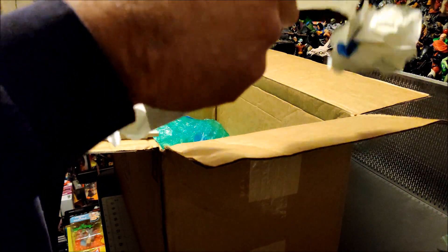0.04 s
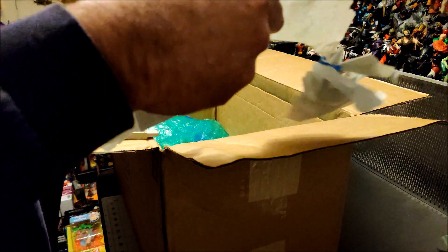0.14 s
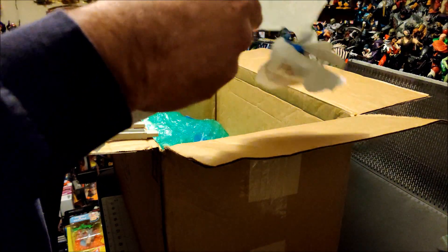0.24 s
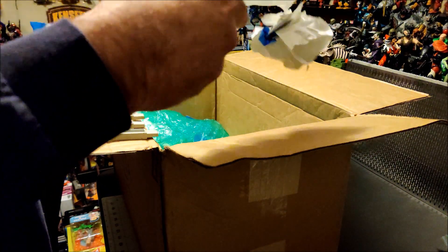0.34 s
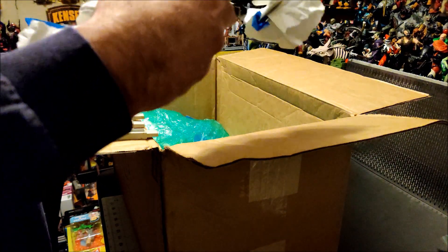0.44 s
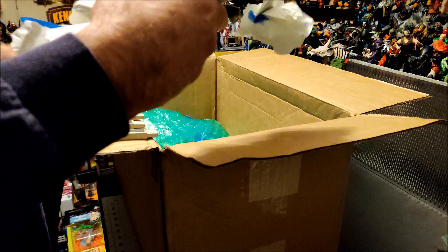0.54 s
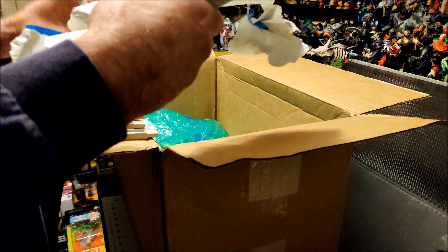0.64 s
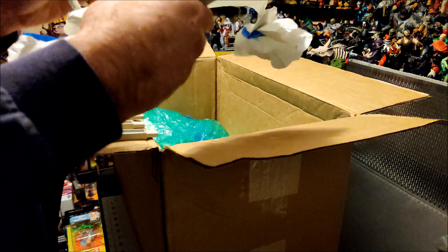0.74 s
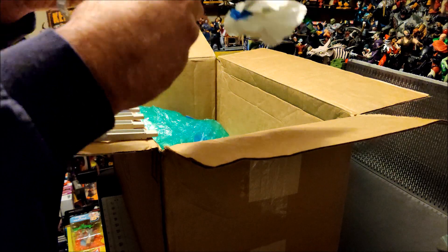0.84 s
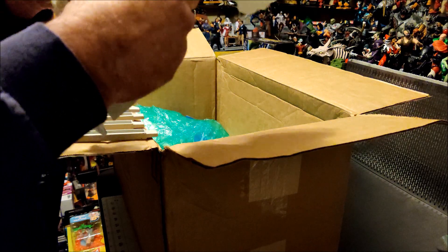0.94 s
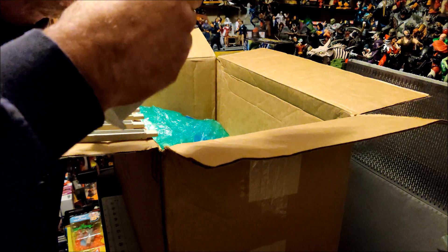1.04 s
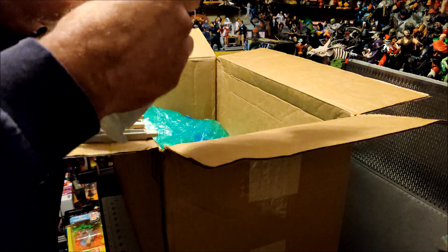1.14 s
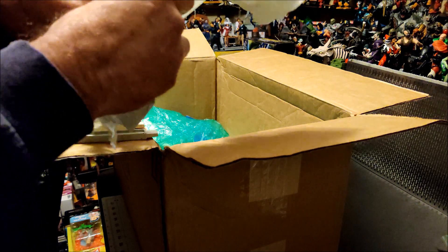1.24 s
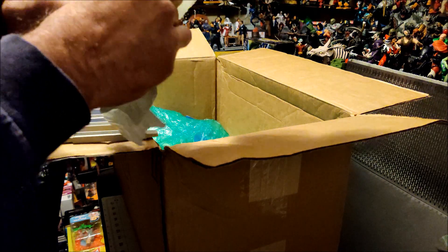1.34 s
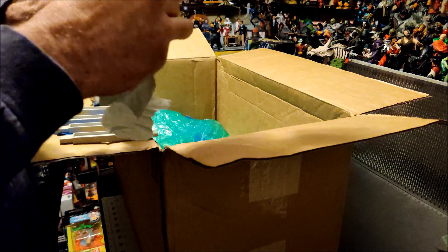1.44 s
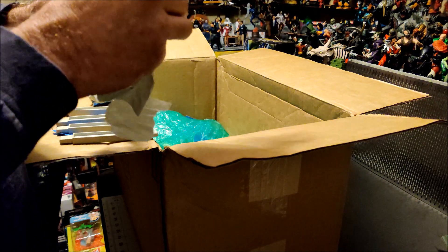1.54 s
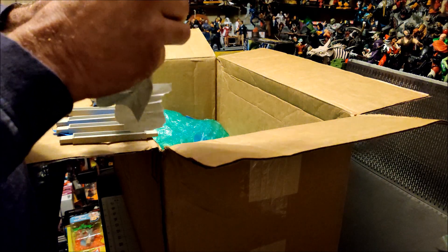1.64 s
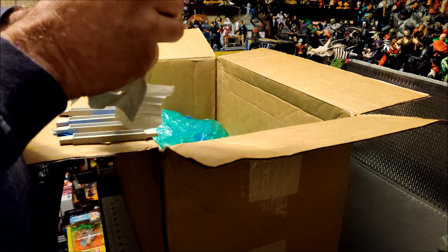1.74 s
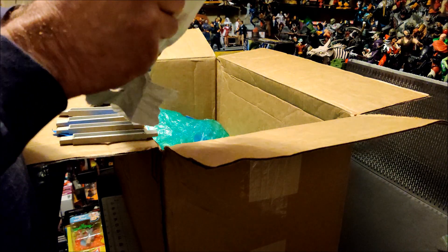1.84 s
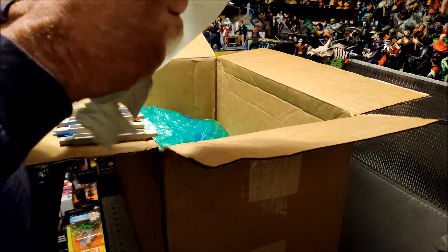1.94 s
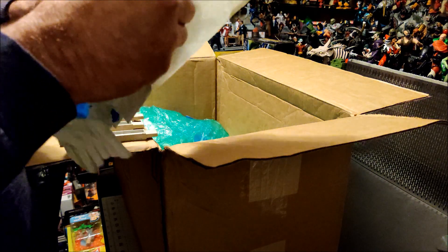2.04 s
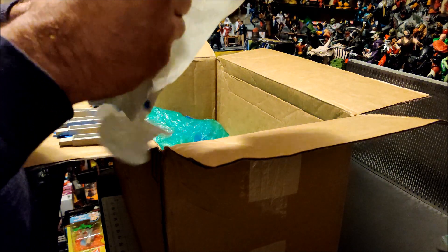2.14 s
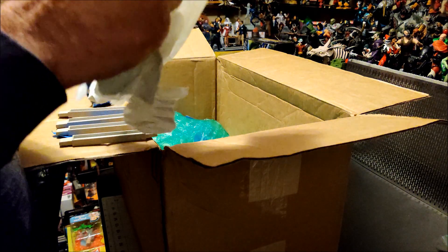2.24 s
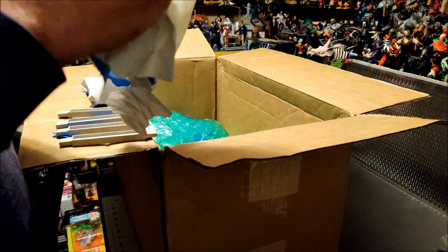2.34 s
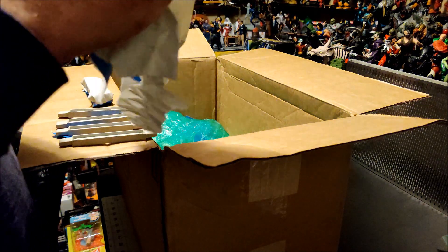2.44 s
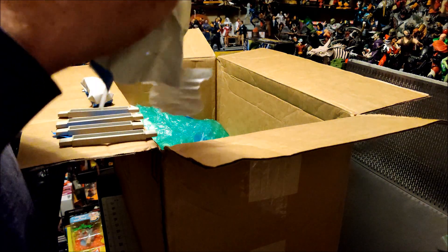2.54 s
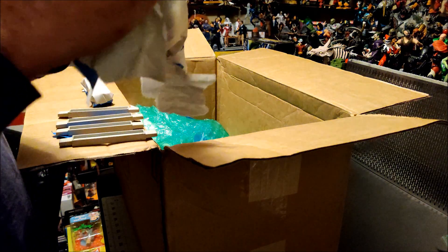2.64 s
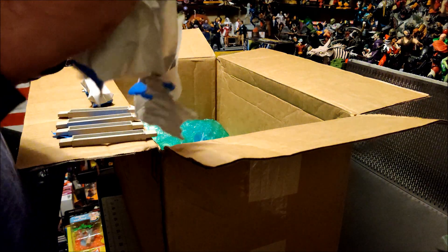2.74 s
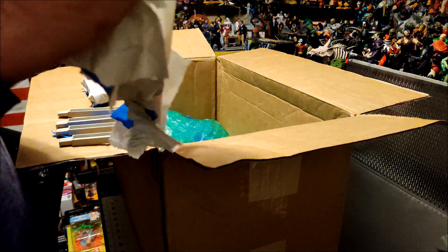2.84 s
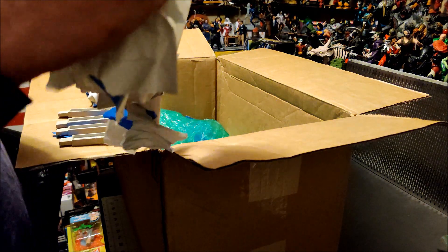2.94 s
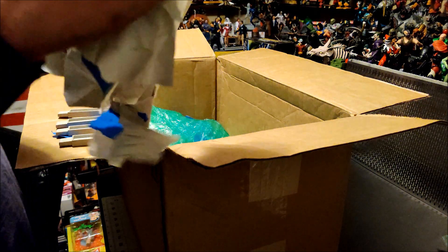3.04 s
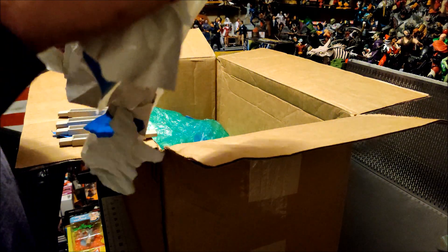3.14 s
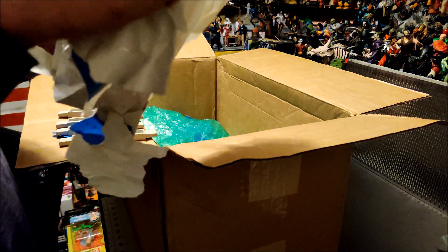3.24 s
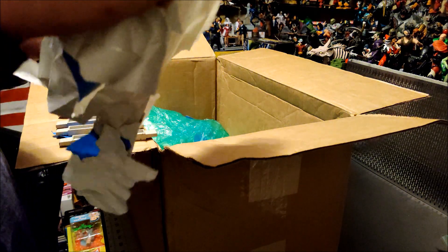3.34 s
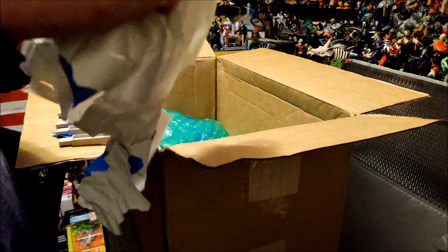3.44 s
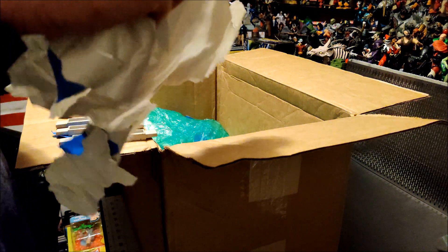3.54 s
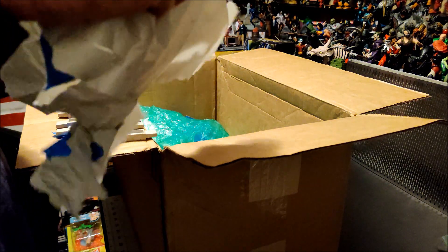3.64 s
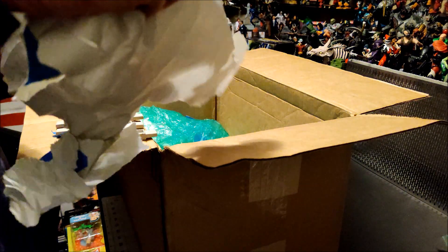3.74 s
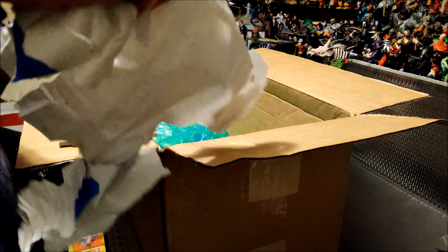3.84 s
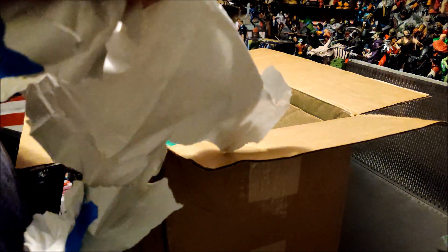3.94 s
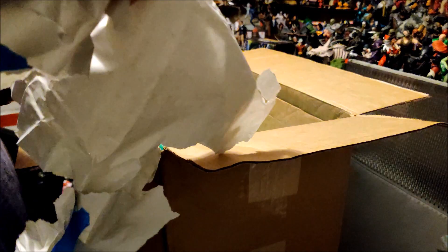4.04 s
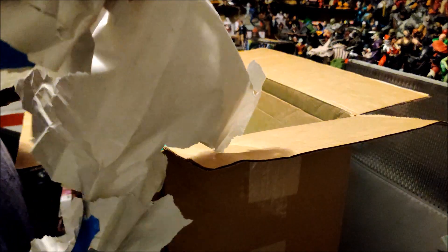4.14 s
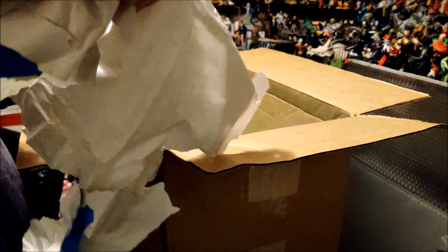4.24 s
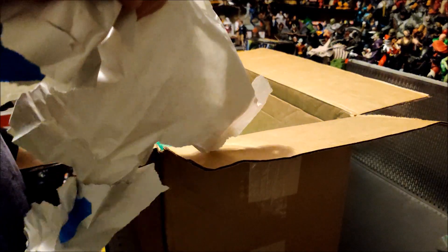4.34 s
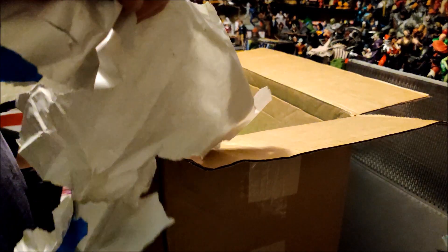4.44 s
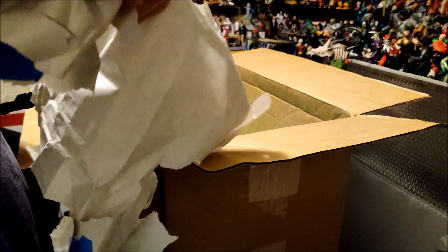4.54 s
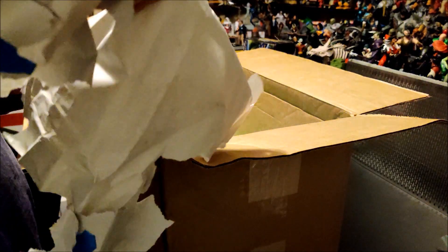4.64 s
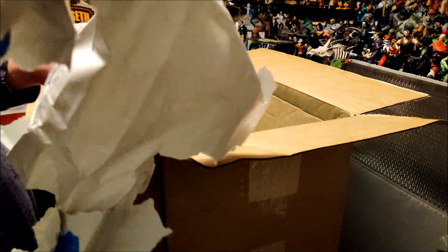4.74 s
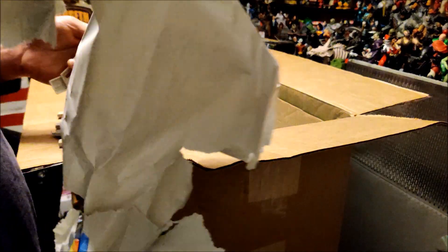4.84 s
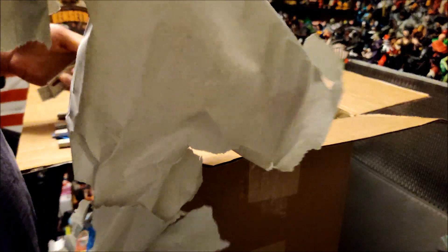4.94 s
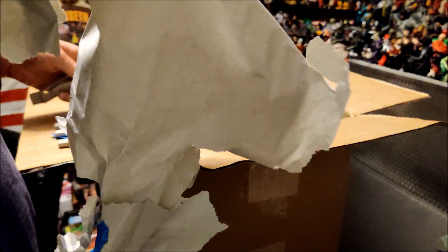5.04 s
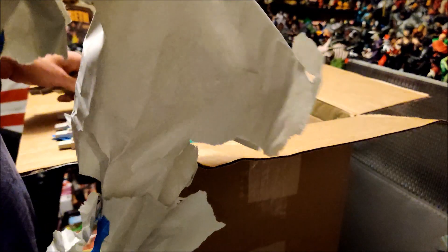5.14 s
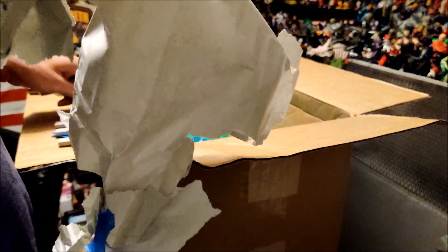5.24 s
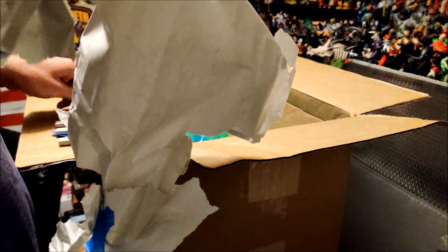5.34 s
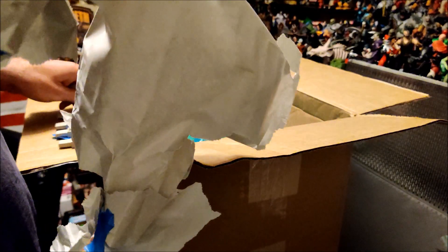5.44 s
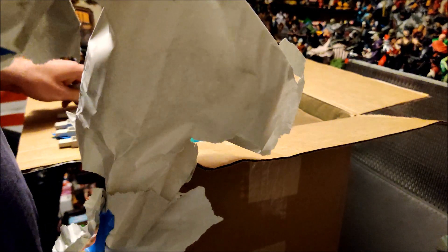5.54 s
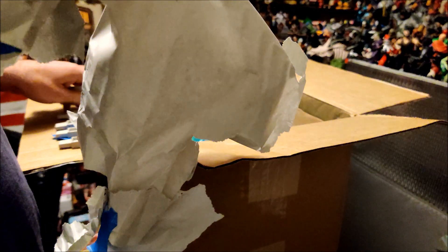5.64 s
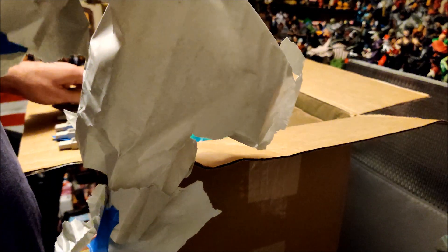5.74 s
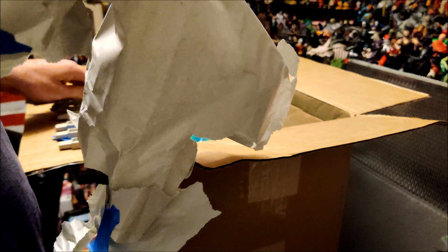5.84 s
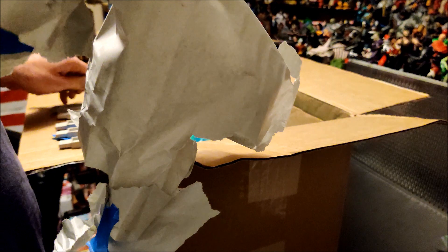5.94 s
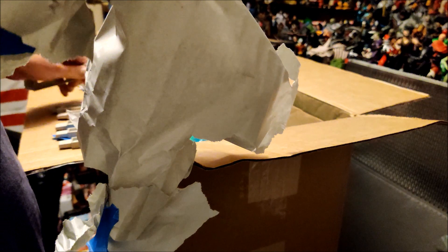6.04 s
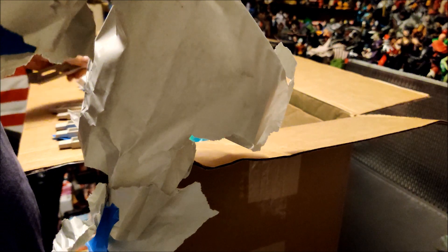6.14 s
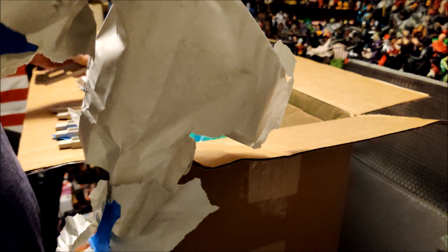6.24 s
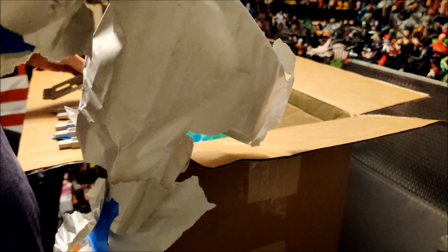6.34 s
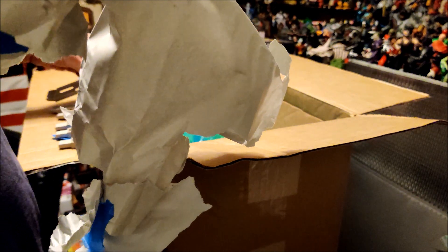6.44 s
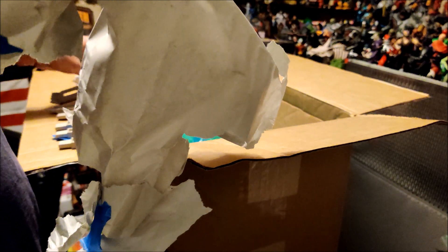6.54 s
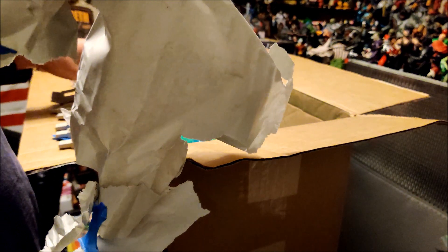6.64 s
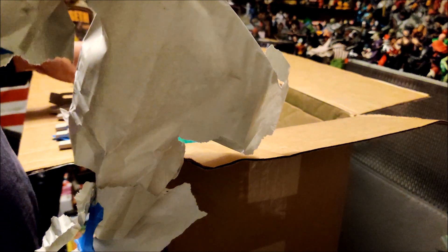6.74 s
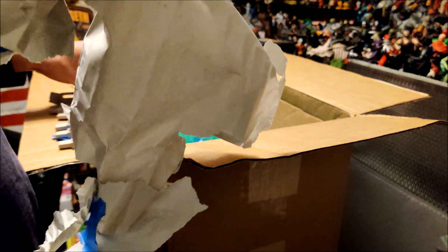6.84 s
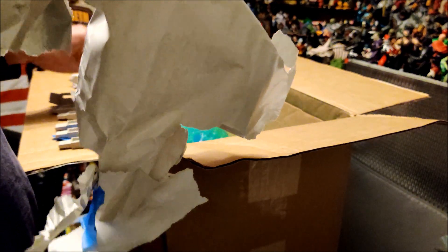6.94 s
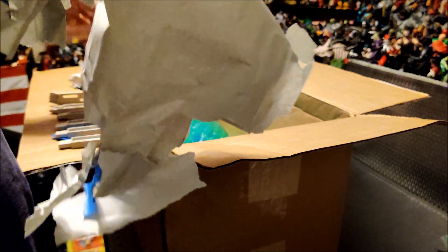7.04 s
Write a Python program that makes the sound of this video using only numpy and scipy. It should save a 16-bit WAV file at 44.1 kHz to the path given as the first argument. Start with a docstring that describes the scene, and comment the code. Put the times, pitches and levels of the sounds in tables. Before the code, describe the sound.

In a quiet small room, nearby hands unwrap something from packing paper. The sheet crinkles lightly at first around a soft knock, then crackles and snaps busily as it is tugged and flaps open. The rustling dies away and gives way to several light taps, brief slides and a single small clink on a tabletop. The microphone carries a faint steady high whine with hiss and low hum.

```python
"""A small room: packing paper is pulled off a wrapped item by hand, over a cardboard box.
Tiny folds flip and layers rub, so the sheet rustles; each tug brings a burst of crackle.
Creases flip with sharp snaps that set off smaller ones, and broad panels flap and push air.
Then small things are slid and set down on the table, with one light clink.
Beneath lie a faint mains hum and hiss, which ringing microphone ports turn into a thin whine."""
import sys
import numpy as np
from scipy import signal
from scipy.fft import rfft, irfft, next_fast_len
from scipy.io import wavfile
from scipy.ndimage import uniform_filter1d

SR = 44100
rng = np.random.default_rng(int(sys.argv[2]) if len(sys.argv) > 2 else 0)


def store_wav(level_fs):
    """Save 16-bit WAV to argv[1]."""
    pcm = np.round(np.clip(np.atleast_2d(level_fs), -1, 1) * 32767)
    wavfile.write(sys.argv[1], SR, pcm.T.astype(np.int16))


N = 312661
TIME_S = np.arange(N) / SR
TABLE_WET_DB = -4.5

# Table levels are relative; spectra are per Hz.
# still-room spectrum: f/Hz, level/dB
AIR_SPECTRUM = [(20, 4.5), (50, 1), (80, -9), (160, -14), (300, -13.5), (500, -19), (1000, -22.5),
                (2500, -25.5), (3600, -31.5), (5100, -41), (7000, -33.5), (16000, -30)]
# mains hum partials: f/Hz, level/dB
HUM_PARTIALS = [(120, -76), (241, -85)]
# paper spectrum: f/Hz, level/dB
PAPER_SPECTRUM = [(80, -15), (170, -6), (500, -2), (800, -4), (1700, -0.5), (3300, -2.5), (4200, -9.5),
                  (6000, -15), (8000, -14.5), (10000, -17.5), (12500, -23.5), (16000, -27.5)]
# how hard the sheet is kept moving: t/s, level/dB
RUSTLE_LEVELS = [(0, -78.5), (0.45, -57.5), (0.76, -66.5), (1.1, -56.5), (1.45, -43.5), (1.9, -40.5),
                 (2.64, -40.5), (2.73, -53.5), (2.88, -41), (3.27, -41.5), (3.34, -48.5), (3.47, -37.5),
                 (3.98, -39), (4.1, -45.5), (4.3, -36.5), (4.7, -38.5), (4.87, -61.5), (5.4, -80)]
# things set down: t/s, level/dB, contact cut-off/Hz, settling/s, hard share/0-1
SET_DOWNS = [(0.27, -47, 930, 0.043, 0.24), (0.596, -35.5, 900, 0.0073, 0.2),
             (0.607, -32, 1120, 0.032, 0.27), (5.355, -32.5, 2640, 0.00094, 0.9),
             (5.734, -36.5, 1800, 0.023, 0), (5.865, -42.5, 908, 0.045, 0.15),
             (5.961, -27.5, 2500, 0.029, 0), (6.459, -69.5, 9000, .001, 0.7),
             (6.655, -46, 895, 0.032, 0.16), (6.821, -28, 1310, 0.025, 0.1)]
# table-top modes: f/Hz, level/dB, T60/s
TABLE_MODES = [(163, -13.5, 0.15), (293, 1.5, 0.099), (355, -9, 0.02), (469, 3, 0.044), (593, 2.5, 0.032),
               (706, -0.5, 0.064), (800, 5, 0.025), (900, 2, 0.0097), (1230, -12, 0.037), (1900, -13, 0.02),
               (2400, -8, .013), (2970, -18, .012)]
# modes of a small hard item: f/Hz, level/dB, T60/s
ITEM_MODES = [(540, 2.5, 0.058), (760, -4, 0.016), (1040, 5, 0.017), (1300, 2, .018), (1960, -1, 0.02),
              (2490, 5, 0.013), (4750, 2.5, 0.0074)]
# main creases that flip: t/s, level/dB, body/dB, treble/dB, crackle run/dB
CREASES = [(0.413, -26.5, 0.5, -19, -2), (0.501, -15, -31, -4, -5), (0.829, -21.5, -0.5, -30, 4.5),
           (0.917, -17.5, -8, -5, 2), (1.137, -21, -7, 5.5, -4), (1.182, -22, -2, 9, 4.5),
           (1.218, -13, 0, 7, 1.5), (1.311, -12.5, -6, -11, 4.5), (1.356, -7, 2.5, 7, -6.5),
           (1.413, -4.5, -8, -4, -3), (1.454, -9, -21, -17, 0.5), (1.522, 0, -7, 7, -5),
           (1.575, -11.5, 9.5, 0, -2), (1.636, -7.5, -1.5, -21, -4), (1.746, -0.5, -4, -6, -1),
           (1.835, -7, -14, 9, -6), (1.882, 4.5, -3, -7, -16), (1.946, 2, 0.5, 5, -5.5),
           (2.11, -7, 0, 13, -7), (2.145, -5.5, 5, -2, -8), (2.219, -5, 5, -4, 2.5),
           (2.272, 3.5, 0.5, 1.5, -4), (2.327, 5.5, -1, 1.5, 1), (2.407, -8.5, 4.5, 1, 3),
           (2.418, -3, 0, 5, -22), (2.485, -6.5, 2, -12, -2), (2.568, -2.5, 1.5, -20, 0),
           (2.632, -1.5, 2, -29, -4), (2.682, -12.5, 10, -17, -5), (2.729, -10.5, -10, -25, -16),
           (2.741, -10, -12, -19, -5), (2.778, -5, -5, 7.5, -0.5), (2.802, -4.5, 1, 4.5, 1.5),
           (2.843, -10, 2, 10, -13), (2.911, 0, -7, -6, -12), (2.926, 4.5, -5.5, -5.5, 1.5),
           (2.973, -2, 4.5, -1, -3.5), (3.004, -5, 3, 7.5, -7), (3.049, -6, 1, -2, -7),
           (3.182, -4, -7, 5, -2), (3.266, -4.5, -1, 0, 1), (3.362, -9, -23, -3, -1),
           (3.42, -4, -8, 0.5, -4), (3.478, 3, -21, -10, -9), (3.598, 2, -7.5, -28, 2),
           (3.774, 5, -6.5, -4, -3.5), (3.883, -2, -3.5, -5, -7), (3.95, 0.5, 5, 0, -2.5),
           (4.007, -6.5, 5, 10.5, 3.5), (4.135, -6.5, -21, 3, -4), (4.178, -6, -38, 0, 3.5),
           (4.218, 2, -17, -7, -4.5), (4.494, -6.5, 2, 5, -5), (4.636, 2.5, -2, 1, -5.5),
           (4.896, -14, 5, -8, -10), (4.975, -26.5, 8.5, 5, -2.5), (5.034, -34, 2, 2, 8.5)]
# tugs on the sheet: t/s, length/s, level/dB, body/dB
TUGS = [(0.989, 0.021, -43, -1), (1.311, 0.028, -34, -4), (1.488, .06, -40.5, 1.5),
        (1.683, 0.048, -36.5, 3), (1.819, 0.096, -25.5, -2), (1.933, 0.062, -38.5, 7),
        (2.027, 0.016, -34.5, 6.5), (2.26, .018, -26, 0), (2.312, 0.015, -24, -1.5), (2.535, 0.058, -29, 1),
        (2.906, 0.027, -30, 1.5), (2.992, .045, -39.5, 8), (3.149, 0.064, -32.5, 1.5),
        (3.435, 0.039, -27.5, -4.5), (3.585, 0.099, -30, 0.5), (3.712, 0.05, -33, -1.5),
        (3.827, 0.019, -34, 4.5), (3.885, 0.05, -29.5, 4), (3.999, 0.019, -29.5, 2.5),
        (4.22, 0.039, -23.5, -1.5), (4.367, 0.034, -31.5, 6.5), (4.573, 0.081, -31.5, -6),
        (4.794, 0.018, -42, 13)]
# panel flaps: t/s, level/dB
PANEL_FLAPS = [(1.95, -55), (2.46, -52), (3.06, -45.5), (3.56, -54), (3.66, -49), (3.94, -52.5),
               (4.26, -46.5), (4.47, -46), (4.69, -50), (4.98, -56.5)]
# spectrum of pushed air: f/Hz, level/dB
PUSH_SPECTRUM = [(20, -0.5), (55, -4), (110, -6), (170, -7), (300, -20.5), (700, -40.5), (2000, -63)]
# pushes across the table: t/s, length/s, level/dB, run-up/s
SLIDE_STROKES = [(5.146, .1, -58.5, 0.016), (5.731, 0.042, -52.5, .005), (5.797, 0.052, -56.5, 0.043),
                 (5.955, 0.013, -51, 0.0055), (6.546, 0.11, -58, 0.11), (6.812, 0.017, -54, .006),
                 (7.027, .06, -65.5, 0.038)]
# sliding friction spectrum: f/Hz, level/dB
SLIDE_SPECTRUM = [(200, 4), (700, 4), (1600, 2.5), (2600, 3.5), (3600, -1.5), (5000, -10.5), (6500, -12),
                  (10000, -15.5), (16000, -33)]
# modes of the clinking item: f/Hz, level/dB, T60/s
CLINK_MODES = [(2505, 2, 0.15), (3050, -2, 0.043), (3440, 4, 0.037), (3800, -5, 0.1)]
# room decay: f/Hz, T60/s
ROOM_DECAY = [(100, 0.26), (400, 0.12), (2000, 0.17), (6000, 0.22), (16000, 0.17)]
# reflection spectrum: f/Hz, level/dB
ROOM_SPECTRUM = [(100, -5.5), (400, -1.5), (900, -0.5), (1500, -2), (2600, 1.5), (5000, 2), (7000, 2),
                 (14000, 3)]
# microphone port resonances, left list then right: f/Hz, width/Hz, level/dB
PORT_MODES = [
    [(5100, 420, 14.5), (3070, 1100, -23.5)],
    [(5040, 270, 14.5)],
]


def from_db(db):
    """Decibels to gain."""
    return 10 ** (np.asarray(db) / 20)


def unit(x):
    """Scale to energy 1."""
    return x / np.sqrt(np.sum(x ** 2) + 1e-20)


def rms_one(x):
    """Scale to rms 1."""
    return x / np.sqrt(np.mean(x ** 2) + 1e-20)


def at_hz(points, hz):
    """Read a table on a log-frequency axis."""
    points_hz, values = np.transpose(points)
    return np.interp(np.log(np.maximum(hz, 1)), np.log(points_hz), values)


def cut(x, hz, kind, order=2):
    """Butterworth filter."""
    sos = signal.butter(order, np.clip(hz, 10, .45 * SR), kind, fs=SR, output="sos")
    return signal.sosfilt(sos, x)


def convolve(x, response):
    """Apply an impulse response; length kept."""
    return signal.fftconvolve(np.atleast_2d(x), np.atleast_2d(response), axes=1)[:, :x.shape[-1]]


def colour(x, spectrum, size=8192):
    """Minimum-phase filter that keeps the power of white noise."""
    hz = np.arange(size // 2 + 1) * SR / size
    cepstrum = irfft(np.log(from_db(at_hz(spectrum, hz))))
    response = irfft(np.exp(rfft(2 * cepstrum[:size // 2], size)))
    return convolve(x, unit(response))


def add(out, start_s, sound):
    """Mix a sound in at a time."""
    i = max(round(start_s * SR), 0)
    out[..., i:i + sound.shape[-1]] += sound[..., :N - i]


def place(x, pan_db, lag_ms, stereo_top_hz=5800):
    """A source to the left is louder there and reaches the right later; treble stays centred."""
    size = next_fast_len(len(x) + 64, True)
    hz = np.arange(size // 2 + 1) * SR / size
    wide = 1 / (1 + (hz / stereo_top_hz) ** 20)
    delay = np.exp(-2j * np.pi * hz * lag_ms / 1000)
    sides = np.array([from_db(pan_db / 2) * wide, from_db(-pan_db / 2) * wide * delay])
    return irfft(rfft(x, size) * (sides + 1 - wide), size)[:, :len(x)]


def stroke(start_s, length_s, attack_s, release_s):
    """A hand movement builds, holds and dies away."""
    t = TIME_S - start_s
    return np.clip(t / attack_s, 0, 1) * np.exp(-np.clip((t - length_s) / release_s, 0, 20))


def background(air_db=-66.5):
    """Room rumble, hiss and mains hum."""
    noise = rng.standard_normal(N) + 0.92 * rng.standard_normal((2, N))
    air = from_db(air_db) * rms_one(colour(noise, AIR_SPECTRUM))
    hum = sum(from_db(db) * np.sqrt(2) * np.sin(2 * np.pi * hz * TIME_S) for hz, db in HUM_PARTIALS)
    return (air + hum) * from_db([[1.5], [-1.5]])


def clicks(per_s, spread_db, size):
    """Random clicks, many small and a few large."""
    heights = from_db(spread_db * np.minimum(rng.exponential(1, size), 4))
    return heights * rng.choice([-1, 1], size) * (rng.random(size) < per_s / SR)


def fold_flip(crack_s=0.0008, ring_share=0.1, decay_cycles=4, size=1024):
    """A fold flips: a broadband crack, and the stiff patch beside it rings briefly."""
    t = TIME_S[:size]
    fade = np.exp(-t / crack_s)
    phase = np.angle(rfft(rng.standard_normal(size) * fade))
    crack = irfft(np.exp(1j * phase)) * np.sqrt(fade)   # flat spectrum
    patch_hz = np.exp(rng.uniform(np.log(900), np.log(7000), (3, 1)))
    rings = np.sin(2 * np.pi * patch_hz * t) * np.exp(-t * patch_hz / decay_cycles)
    return unit(unit(crack) + ring_share * unit(rings.sum(axis=0)))


def crackle(per_s, spread_db, rub_share=0.28, spots=8):
    """Tiny folds flip all over the sheet while its layers rub; level held even."""
    folds = 0
    for _ in range(spots):
        flips = clicks(per_s / spots, spread_db, N)
        fold = place(fold_flip(crack_s=0.00054), rng.normal(7.2, 1), rng.normal(0.16, 0.085))
        folds = folds + convolve(flips, fold)
    out = rms_one(folds) + rub_share * place(rng.standard_normal(N), pan_db=1.8, lag_ms=0.069)
    power = uniform_filter1d(np.mean(out ** 2, axis=0), size=1800)
    return colour(out / np.sqrt(power + 1e-9), PAPER_SPECTRUM)


def tint(x, body_db, treble_db, body_hz=1200, treble_hz=7000):
    """Wide folds have more body, tight ones more treble."""
    low, rest = (cut(cut(x, body_hz, kind), body_hz, kind) for kind in ("low", "high"))
    middle, high = (cut(cut(rest, treble_hz, kind), treble_hz, kind) for kind in ("low", "high"))
    return from_db(body_db) * low + middle + from_db(treble_db) * high


def rustle(strength, unfold_db_per_s=0.9):
    """The moving sheet crackles, gaining body as it opens."""
    body_db = -1 + unfold_db_per_s * TIME_S
    return strength * tint(crackle(per_s=900, spread_db=3.5), body_db, treble_db=3)


def ring(modes, t):
    """Damped modes, each struck with its own strength."""
    return unit(sum(from_db(db + rng.normal(0, 1.0) - 60 * t / t60_s) * np.sin(2 * np.pi * hz * t)
                    * (-1) ** k for k, (hz, db, t60_s) in enumerate(modes)))


def knocks(gain_db=20, tick_gain=0.8, rock_gain=1.87, thud_gain=0.47, thud_s=0.0084, size=12000):
    """An item lands and rocks to rest; it and the table ring over a thud. Hard taps land cleanly."""
    out, t = np.zeros((2, N)), TIME_S[:size]
    for start_s, db, contact_hz, settle_s, hard in SET_DOWNS:
        soft = 1 - hard
        touches = rock_gain * soft * unit(clicks(2500, 1.6, size) * np.exp(-t / settle_s))
        touches[0] += 1   # first contact
        body = soft * ring(TABLE_MODES, t) + hard * ring(ITEM_MODES, t)
        thud = cut(rng.standard_normal(size), [230, 2000], "band", order=1) * np.exp(-t / thud_s)
        body += thud_gain * unit(thud)
        add(body, 0, tick_gain * cut(fold_flip(), 9000, "low"))   # contact tick
        knock = unit(cut(convolve(touches, body)[0], contact_hz, "low"))
        add(out, start_s, from_db(db + gain_db) * table_echo(place(knock, pan_db=2.9, lag_ms=0.11)))
    return out


def stray_creases(strength, count=70, over_db=20.5, spread_db=1.5, run_db=-12.5):
    """Lesser creases flip at random, as strongly as the sheet is handled; rows as in CREASES."""
    times_s = (np.arange(count) + rng.random(count)) / count * RUSTLE_LEVELS[-1][0]
    level, body, treble = rng.standard_normal((count, 3)).T
    level_db = 20 * np.log10(np.interp(times_s, TIME_S, strength)) + over_db + spread_db * level
    return list(zip(times_s, level_db, 1.5 + 5.4 * body, -1.5 + 3.5 * treble, np.full(count, run_db)))


def snaps(strength, run_s=0.02, run_per_s=3300, size=5000):
    """A crease flips, then sheds its stress in a dying run of smaller crackles."""
    out, fade = np.zeros((2, N)), np.exp(-TIME_S[:size] / run_s)
    for start_s, db, body_db, treble_db, run_db in CREASES + stray_creases(strength):
        snap = from_db(run_db) * unit(clicks(run_per_s, 2.4, size) * fade)
        add(snap, 0, fold_flip())
        snap = tint(snap, body_db, treble_db)
        snap = place(snap, pan_db=rng.normal(1.5, 1.1), lag_ms=rng.normal(0.14, 0.053))
        add(out, start_s, from_db(db) * snap)
    return colour(out, PAPER_SPECTRUM)


def tugs(attack_s=0.017, release_s=0.018):
    """Each tug sets off denser crackle. Returns the sound and its envelope."""
    strokes = np.array([from_db(db) * stroke(start_s, length_s, attack_s, release_s)
                        for start_s, length_s, db, _ in TUGS])
    strength = strokes.sum(axis=0)
    body_db = np.array(TUGS)[:, 3] @ strokes / (strength + 1e-6)   # follows the tug under way
    return strength * tint(crackle(per_s=1800, spread_db=4.5), body_db, treble_db=3.5), strength


def flaps(strength, half_length_s=0.04, steady_db=-20):
    """Broad panels push air at the microphones: gently with the rustle, in puffs as they flap."""
    puffs = sum(from_db(db) / (1 + ((TIME_S - peak_s) / half_length_s) ** 4)
                for peak_s, db in PANEL_FLAPS)
    noise = rng.standard_normal(N) + 0.19 * rng.standard_normal((2, N))
    air = rms_one(colour(noise, PUSH_SPECTRUM))
    return (from_db(steady_db) * strength + puffs) * air * from_db([[2.5], [-2.5]])


def slides(release_s=0.03):
    """Dense slips under an item pushed along the table."""
    speed = sum(from_db(db) * stroke(start_s, length_s, run_up_s, release_s)
                for start_s, length_s, db, run_up_s in SLIDE_STROKES)
    slips = speed * rms_one(clicks(per_s=6000, spread_db=5.2, size=N))
    return table_echo(colour(place(slips, pan_db=1.8, lag_ms=0.25), SLIDE_SPECTRUM))


def clink(start_s=5.827, level_db=-23, size=12000):
    """An item rings lightly as it is pushed on."""
    out = np.zeros((2, N))
    ringing = place(ring(CLINK_MODES, TIME_S[:size]), pan_db=2, lag_ms=0.08)
    add(out, start_s, from_db(level_db) * table_echo(ringing))
    return out


def reflections(count, box_gain=1.14, box_s=0.0022, build_s=0.0059, size=10000):
    """Stereo patterns of quick echoes from box and table, then the walls, dying by band."""
    t, tails = TIME_S[:size], 0
    edges_hz = np.geomspace(60, 18000, 10)
    near = unit(np.exp(-t / box_s))
    white = rng.standard_normal((count, 2, size))
    for low_hz, high_hz in zip(edges_hz, edges_hz[1:]):
        hz = np.sqrt(low_hz * high_hz)
        walls = unit(from_db(-60 * t / at_hz(ROOM_DECAY, hz)) * (1 - np.exp(-t / build_s)))
        white = white[:, ::-1, ::-1]   # decorrelates adjacent bands
        band = cut(white, [low_hz, high_hz], "band")
        tails = tails + from_db(at_hz(ROOM_SPECTRUM, hz)) * unit(walls + box_gain * near) * band
    return tails


def paper_echo(x, wet_db=2, count=48, block=512):
    """Each paper sound comes from a new spot, so the reflection pattern keeps changing."""
    patterns, out = from_db(wet_db) * reflections(count), x.copy()
    for k, i in enumerate(range(0, N, block)):
        add(out, i / SR, signal.fftconvolve(x[:, i:i + block], patterns[k % count], axes=1))
    return out


def table_echo(x):
    """A sound from one spot on the table, plus that spot's reflections."""
    return x + from_db(TABLE_WET_DB) * convolve(x, reflections(count=1)[0])


def scene():
    """Paper and table sounds over the quiet room."""
    motion = from_db(np.interp(TIME_S, *np.transpose(RUSTLE_LEVELS)))
    rustling = rustle(motion)
    tugging, pull = tugs()
    flapping = flaps(motion)
    paper = from_db(-5) * (rustling + tugging) + from_db(-4) * snaps(np.hypot(motion, pull))
    return paper_echo(paper) + flapping + knocks() + clink() + slides() + background()


def record(dry, cutoff_hz=16100):
    """Each microphone port rings near 5 kHz, turning hiss into a thin whine; the top is cut."""
    heard = []
    for x, modes in zip(dry, PORT_MODES):
        ringing = sum(from_db(db) * signal.lfilter(*signal.iirpeak(hz, hz / width_hz, fs=SR), x)
                      for hz, width_hz, db in modes)
        heard.append(x + ringing)
    return signal.sosfilt(signal.ellip(10, .1, 80, cutoff_hz, fs=SR, output="sos"), heard)


dry = scene()
out = record(dry)
store_wav(out)
```